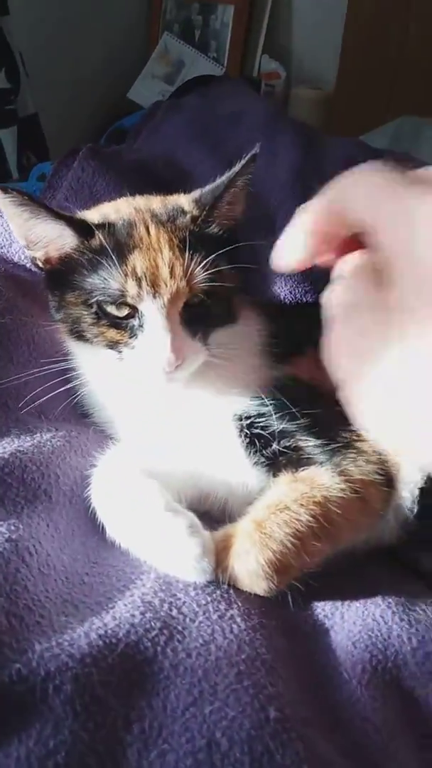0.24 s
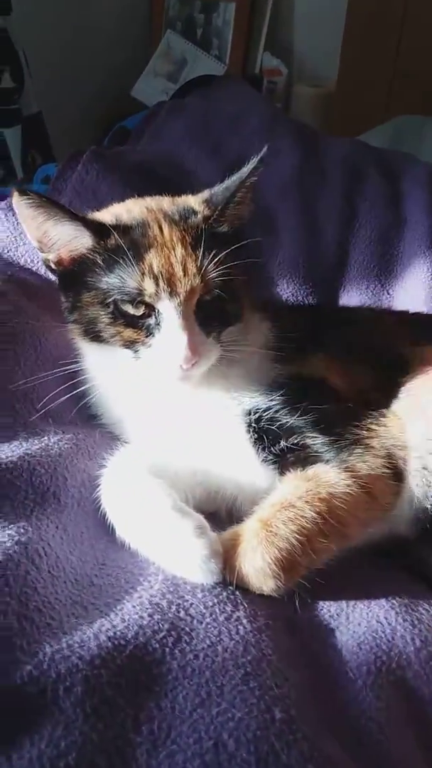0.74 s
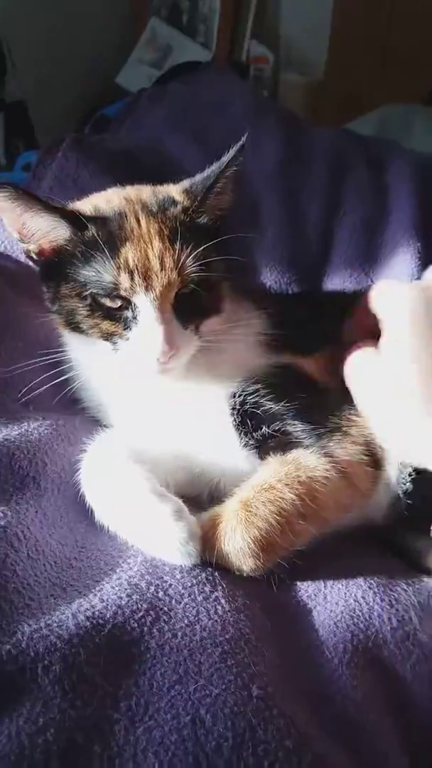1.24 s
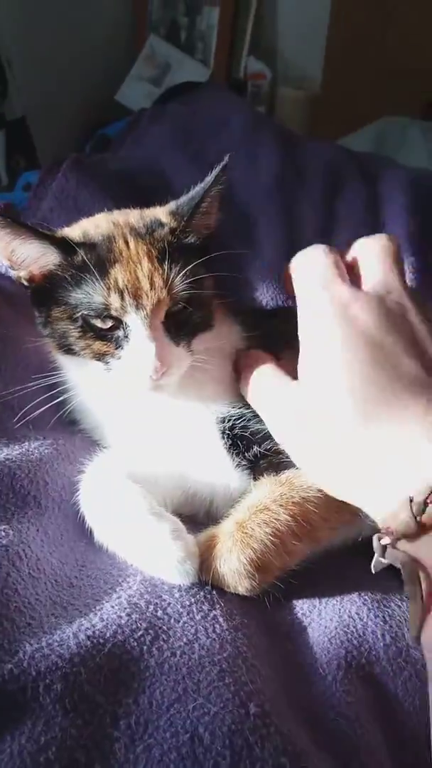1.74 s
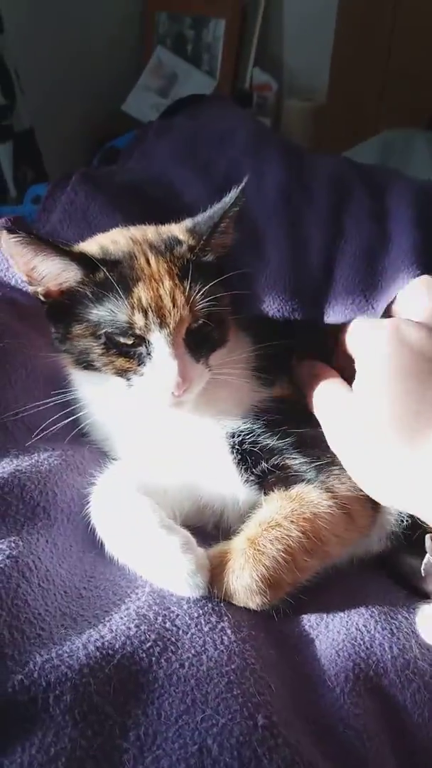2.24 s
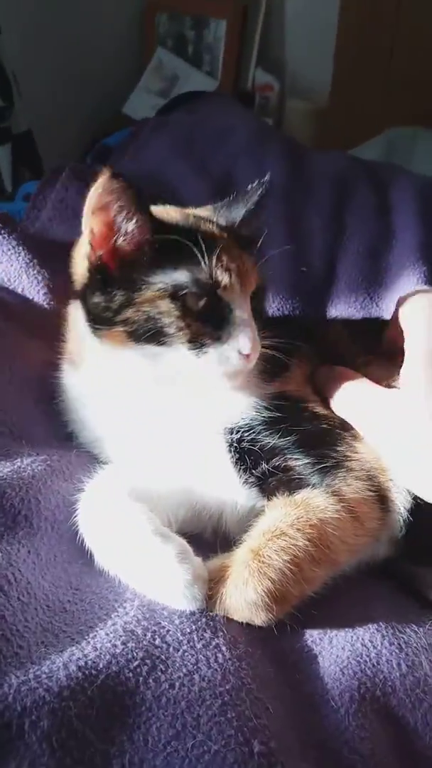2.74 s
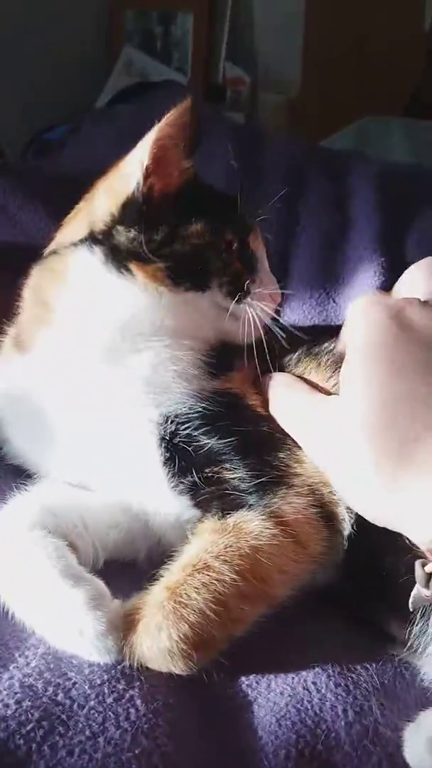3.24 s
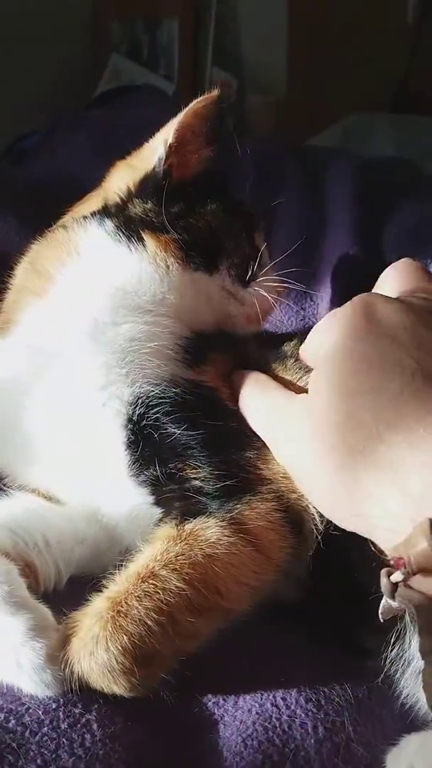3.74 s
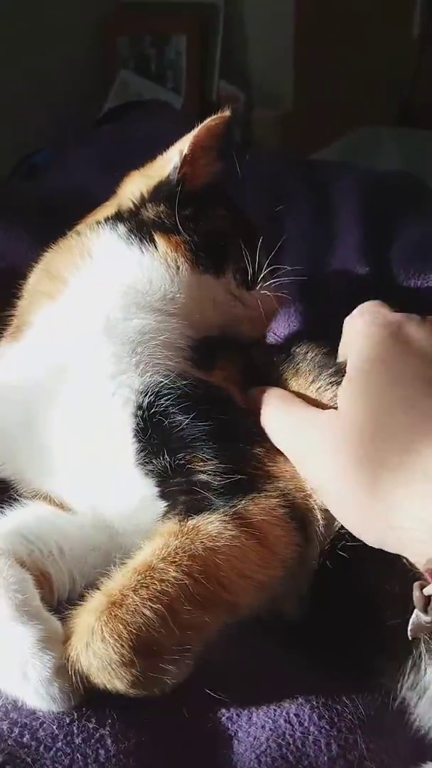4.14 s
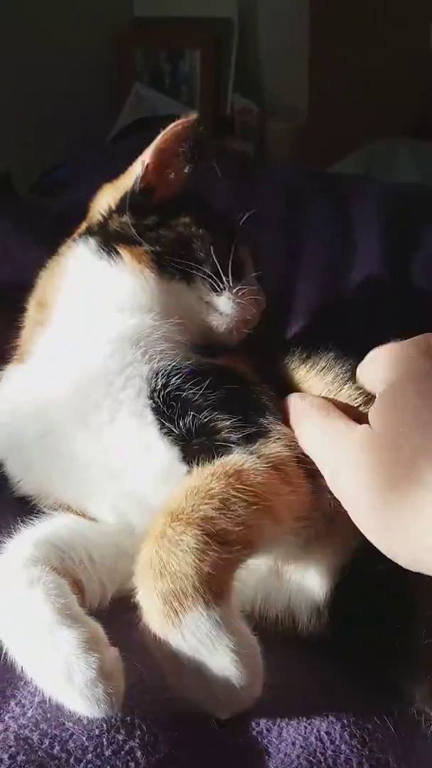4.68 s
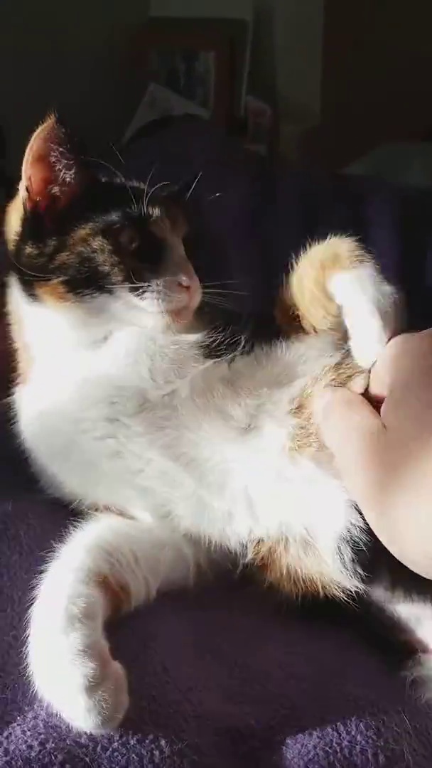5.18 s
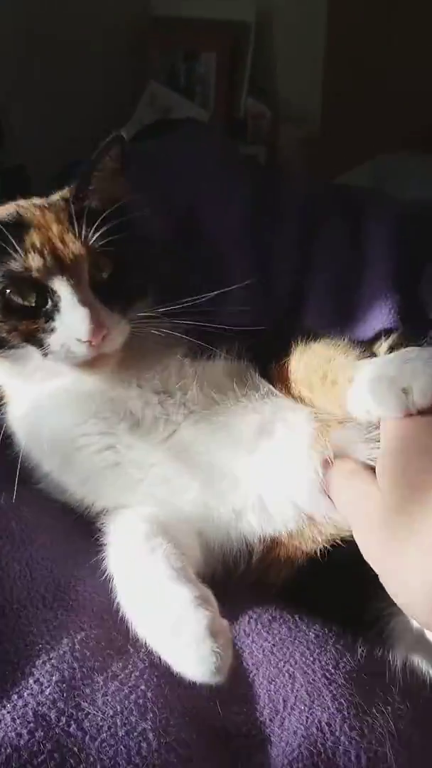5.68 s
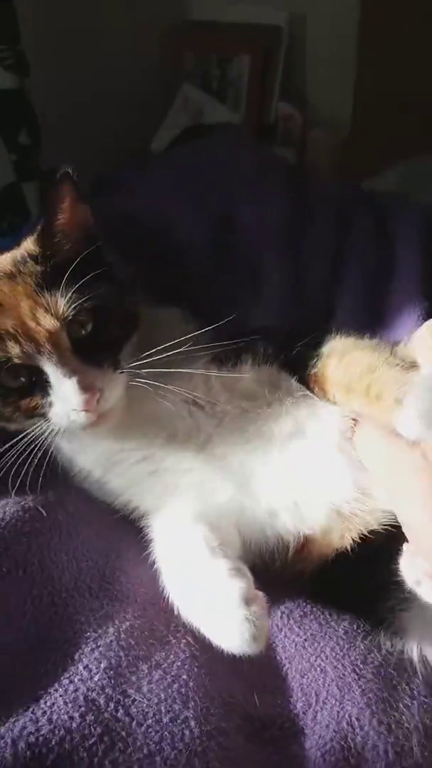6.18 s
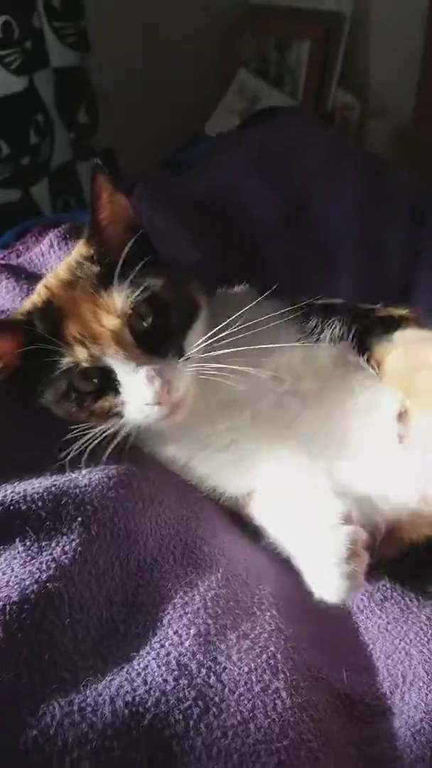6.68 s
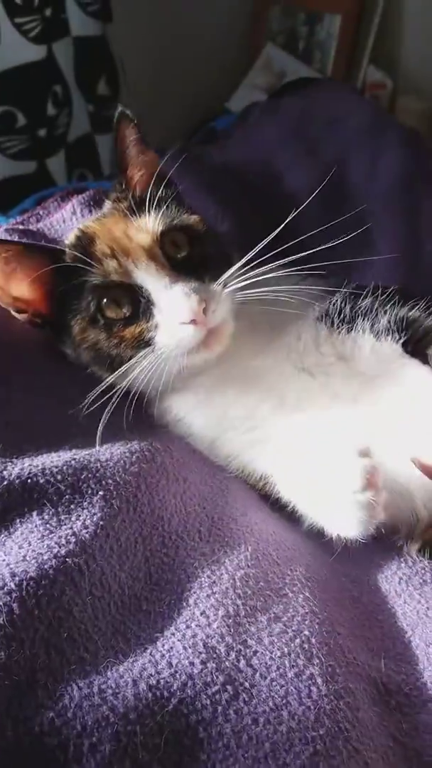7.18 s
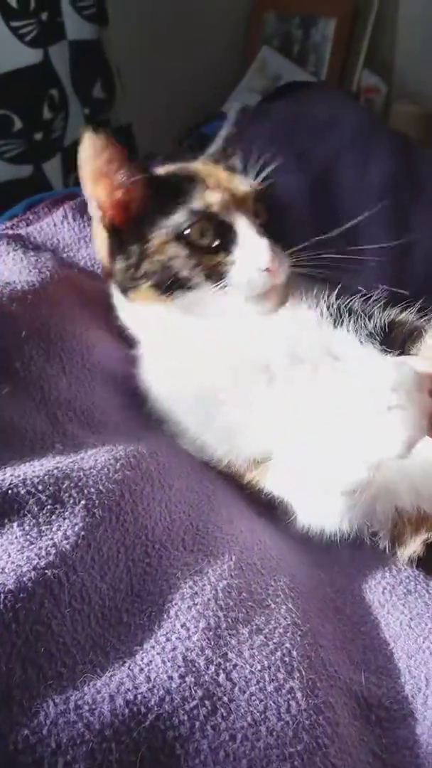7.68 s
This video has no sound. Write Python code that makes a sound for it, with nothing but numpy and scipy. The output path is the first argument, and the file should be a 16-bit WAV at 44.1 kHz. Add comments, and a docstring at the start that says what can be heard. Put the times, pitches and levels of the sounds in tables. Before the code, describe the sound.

Close, dry handling noise in a quiet room, about eight seconds. A low, unevenly throbbing rumble and faint steady hiss run throughout, with soft rubbing that swells and fades. From 0.1 to 1.1 seconds, dull bumps come thickly, each a quick falling sweep with a short bassy boom; short scuffs and small ticks mix in, with a heavy lurch at 0.7. The strongest jolt, with a clear tick and scrape, lands at 1.25. A lone bump follows at 1.8, softer ones from 2.3, then a tight scuffing cluster with ticks at 3.1 to 3.2. Another scrape and thump come at 3.7, lighter bumps around 4, and a firm thud at 4.4. After a pause, muffled knocks come from 5.0 to 5.75, the strongest at 5.3. A low lurch at 6.5 leads to bumps at 6.6, 6.9 and 7.3, and softer ones with a scuff near 7.8.

```python
"""A hand shifts its hold on a phone case: dull bumps sweep downwards and boom briefly, a few with a faint tick.
Each bump is a push that the case spreads into a falling sweep, with a snap and a low ring added.
Three heavier lurches swing low, and short bursts of tiny slips make the scuffs.
Underneath are an unevenly throbbing rumble, soft rubbing and microphone hiss, all from random numbers.
The room is quiet: a cat is stroked on a blanket close by, but no layer plays the cat itself."""
import sys
import numpy as np
from scipy import signal
from scipy.fft import rfft, irfft, next_fast_len
from scipy.io import wavfile
from scipy.ndimage import map_coordinates

SR = 44100
rng = np.random.default_rng(int(sys.argv[2]) if len(sys.argv) > 2 else 0)


def dump_mix(stems):
    """Bounce the given channels to the path in sys.argv[1] as a 16-bit WAV at rate SR."""
    frames = np.atleast_2d(stems).T  # one column per channel
    limited = np.clip(frames, -1, 1)  # hard clip at full scale
    pcm = np.round(limited * 32767).astype(np.int16)
    wavfile.write(sys.argv[1], SR, pcm)


N = 349272  # length of the scene [samples]


def amp(db):
    """Turn decibels into a gain."""
    return 10 ** (np.asarray(db) / 20)


def unit(x):
    """Scale to an rms (average strength) of 1."""
    return x / np.sqrt(np.mean(x ** 2) + 1e-20)


def peak_one(x):
    """Scale so that the highest peak is 1."""
    return x / np.abs(x).max()


def add(track, s, sound):
    """Mix a sound into the track from time s."""
    start = max(round(s * SR), 0)
    part = track[start:start + len(sound)]
    part += sound[:len(part)]


def filtered(x, response):
    """Filter x by a complex response, given as a function of frequency."""
    m = next_fast_len(len(x) + 8192)  # spare room, so that tails do not wrap round to the start
    hz = np.fft.rfftfreq(m, 1 / SR)
    return irfft(rfft(x, m) * response(hz), m)[:len(x)]


def colour(x, spectrum):
    """Shape x by (frequency, level) points and bring it to rms 1."""
    point_hz, point_db = np.transpose(spectrum)

    def response(hz):
        return amp(np.interp(np.log(hz + 1), np.log(point_hz), point_db))

    return unit(filtered(x, response))


def noise(spectrum, size):
    """Make steady coloured noise of rms 1."""
    return colour(rng.standard_normal(size), spectrum)


def high_pass(hz, corner_hz, q):
    """Response of a second-order bass cut; a high q makes it resonate at the corner."""
    s = 1j * hz / corner_hz
    return s * s / (1 + s / q + s * s)


def wobble(per_s):
    """Draw a smooth random curve with so many knots a second."""
    knots = rng.standard_normal(int(N * per_s / SR) + 4)
    return map_coordinates(knots, [np.arange(N) * per_s / SR])


def case(hz, hardness_hz, thin_hz, corner_hz=66, q=1.89, thin_q=0.56, bending_hz=1.606):
    """What the microphone gets from one soft push on the case."""
    contact = np.exp(-hz / hardness_hz)  # soft skin passes little treble
    bending = np.exp(-1j * np.sqrt(hz / bending_hz))  # high bending waves arrive first: a falling sweep
    return contact * high_pass(hz, thin_hz, thin_q) * high_pass(hz, corner_hz, q) * bending


# colour of the microphone's hiss: (frequency [Hz], relative level [dB per Hz])
HISS_COLOUR = [(20, -2.5), (300, 9.5), (600, 9), (1200, 6), (2000, 3.5), (3300, 0), (5000, -5.5),
               (7000, -13.5), (8500, -12), (11000, -3.5), (12700, 1.5), (14000, -1), (15000, 0.5),
               (20000, -20.5)]


def hiss(level_db=-69):
    """The microphone's hiss: steady random noise, coloured by the table."""
    return amp(level_db) * noise(HISS_COLOUR, N)


# how restless the grip is: (time [s], level [dB]), the rubbing before its overall boost
GRIP_RESTLESSNESS = [(0.0, -69.5), (0.15, -69.5), (0.55, -55), (0.84, -58), (0.99, -51.5), (1.19, -65),
                     (1.45, -63.5), (2.32, -71), (2.6, -50), (3.64, -52.5), (4.19, -65.5), (4.61, -62),
                     (5.45, -60), (6.15, -65.5), (6.46, -62), (6.57, -63.5), (7.7, -57.5), (7.92, -50.5)]


def restlessness_db(s):
    """Restlessness of the grip at time s, in straight lines between the table's points."""
    return np.interp(s, *np.transpose(GRIP_RESTLESSNESS))


# colour of the low rumble: (frequency [Hz], relative level [dB per Hz])
RUMBLE_COLOUR = [(20, -21.5), (32, -15.5), (45, -6), (62, 4.5), (85, -1), (120, -5), (170, -32.5),
                 (260, -31.5), (600, -60)]


def rumble(restless_db, grip, mean_db=-44.5, follows=0.25, throb_db=2.5):
    """Low noise that throbs with the grip and swells a little (follows, dB per dB) when it is restless."""
    level_db = mean_db + follows * (restless_db - restless_db.mean())
    return amp(level_db + throb_db * grip) * noise(RUMBLE_COLOUR, N)


def rubbing(restless_db, grip, boost_db=7.0, slips_per_s=190, spread_db=4.5,
            hardness_hz=68, thin_hz=240, catch_db=2.5):
    """Many small slips of skin at random moments, each pushing the case one way or the other."""
    happens = rng.random(N) < slips_per_s / SR
    strength = amp(spread_db * rng.standard_normal(N))
    slips = happens * strength * rng.choice([-1, 1], N)
    through_case = unit(filtered(slips, lambda hz: case(hz, hardness_hz, thin_hz)))
    return amp(restless_db + boost_db + catch_db * grip) * through_case


def ground():
    """The rumble and the rubbing, which swell together as the grip wavers."""
    restless_db = restlessness_db(np.arange(N) / SR)
    grip = np.tanh(wobble(22))  # the pressure of the hand stays within bounds
    return rumble(restless_db, grip) + rubbing(restless_db, grip)


# colour of a tick: (frequency [Hz], relative level [dB per Hz])
TICK_COLOUR = [(300, -5.5), (700, 8.5), (1300, -2.5), (2000, -14), (3100, -22.5), (4000, -32.5),
               (6000, -55.5)]
# small dry ticks of the case, most of them close to a bump: (time [s], peak level [dB])
TICK_TIMES = [(0.416, -45), (.689, -39), (1.247, -52.5), (1.256, -26.5), (1.271, -37), (1.778, -43.5),
              (1.781, -38), (2.454, -49), (3.068, -44), (3.075, -36.5), (3.098, -41.5), (3.116, -38.5),
              (3.159, -43), (3.704, -57), (6.501, -52)]


def ticks(grit=0.12, t60=0.017, bending_hz=3, size=2048):
    """Small dry ticks: one crack with a gritty tail, its high part arriving first as in the bumps."""
    track = np.zeros(N)
    lead = 0.005  # silence kept ahead of the crack [s]
    t = np.arange(size) / SR
    for s, db in TICK_TIMES:
        tail = grit * rng.standard_normal(size) * amp(-60 * t / t60)
        crack = np.pad((t == 0) + tail, (round(lead * SR), 0))
        swept = filtered(crack, lambda hz: np.exp(-1j * np.sqrt(hz / bending_hz)))
        tick = peak_one(colour(swept, TICK_COLOUR))
        add(track, s - lead - 0.001, amp(db) * tick)  # 1 ms early, as the sweep delays the sound
    return track


# skin drags over the case: (time [s], length [s], peak level [dB])
SCUFF_TIMES = [(0.201, 0.01, -43), (0.261, 0.022, -29.5), (0.66, 0.025, -30.5), (0.743, 0.027, -32),
               (0.868, 0.095, -32.5), (0.911, 0.017, -31), (1.052, 0.028, -39), (1.232, 0.026, -19),
               (1.271, 0.015, -21.5), (1.383, 0.027, -37), (2.445, 0.024, -33), (3.062, 0.095, -25),
               (3.611, 0.017, -30.5), (3.682, 0.047, -21), (4.074, 0.034, -27), (5.33, 0.034, -33.5),
               (5.901, .015, -43.5), (6.185, 0.062, -41), (6.3, 0.013, -41), (6.432, 0.063, -38),
               (6.551, 0.014, -33.5), (6.862, 0.018, -38.5), (7.222, 0.053, -38), (7.343, 0.02, -27),
               (7.806, 0.082, -35)]


def scuffs(hardness_hz=115, thin_hz=190, size=8192):
    """Short drags: a dense swell of tiny slips that sounds through the case."""
    track = np.zeros(N)
    t = np.arange(size) / SR
    for s, length, db in SCUFF_TIMES:
        swell = np.sin(np.pi * np.clip(t / length, 0, 1))
        slips = rng.standard_normal(size) * swell
        scuff = peak_one(filtered(slips, lambda hz: case(hz, hardness_hz, thin_hz)))
        add(track, s, amp(db) * scuff)
    return track


# the whole phone lurches in the hand: (time [s], peak level [dB])
LURCH_TIMES = [(0.694, -17.5), (1.26, -13.5), (6.503, -17)]


def lurches(swing_hz=65, rise=0.0062, t60=0.05, size=8192):
    """A heavy swing of the phone against the palm, which damps it quickly (60 dB in t60 seconds)."""
    track = np.zeros(N)
    t = np.arange(size) / SR
    shape = (1 - np.exp(-(t / rise) ** 2)) * amp(-60 * t / t60)
    swing = peak_one(np.sin(2 * np.pi * swing_hz * t) * shape)
    for s, db in LURCH_TIMES:
        add(track, s, amp(db) * swing)
    return track


# fingers bump the case; snap and ring levels are relative to the push, the ring before its overall boost:
# (time [s], push peak level [dB], contact hardness [Hz], snap level [dB], ring level [dB])
BUMP_TIMES = [(0.102, -32, 127, -22, 13.5), (0.287, -12.5, 75.5, -41, -16), (0.416, -10.5, 136, -17.5, -31),
              (0.432, -15.5, 107, -42.5, -32), (0.46, -17, 105, -20, -4), (0.568, -16.5, 105, -11.5, -10.5),
              (0.628, -12.5, 74, -45, -26), (0.669, -14, 78, -36, -33), (0.688, -8, 72, -32.5, -6),
              (0.751, -12, 64, -29, -8.5), (0.858, -16.5, 75, -48, 5.5), (0.879, -16.5, 80, -33, -32),
              (0.919, -17.5, 98, -26, -12), (0.93, -21, 80, -36, -0.5), (0.988, -13, 109, -15, -8.5),
              (1.073, -31.5, 81, -38, 11.5), (1.254, -5.5, 52, -12.5, -11), (1.27, -7, 80, -20, -1.5),
              (1.781, -17, 100, -26, -1.5), (2.324, -25, 117, -28, -21), (2.459, -22.5, 95, -41, -16),
              (2.533, -34.5, 90, -37, -10), (2.788, -27, 105, -18, -15), (2.897, -21.5, 80, -48, 6),
              (3.073, -17, 67, -18.5, -15.5), (3.095, -13, 120, -50, -29), (3.114, -13, 110, -46, -30),
              (3.155, -15, 118, -46, -35.5), (3.187, -23, 110, -22, -5), (3.293, -21, 58, -50, 5.5),
              (3.382, -27, 95, -52, 3.5), (3.429, -29, 83, -46, -20), (3.675, -30, 128, -15, -22),
              (3.709, -12.5, 92, -22.5, -7), (3.759, -17, 81.5, -22.5, 6), (3.91, -24.5, 94, -43, -11),
              (3.971, -28.5, 96, -44, -15), (4.046, -27, 105, -49, -23), (4.078, -25, 95, -38, 11),
              (4.1, -28.5, 88, -13, -4), (4.381, -10, 79, -20.5, -15), (4.461, -29, 71, -30, 2),
              (5.026, -21.5, 106, -50, 1), (5.061, -31, 99, -25, 4), (5.188, -22.5, 56, -34.5, -9),
              (5.327, -12.5, 78.5, -36, -22), (5.342, -17.5, 96, -22.5, 7.5), (5.53, -26, 94, -52, -9),
              (5.749, -28, 58, -24, -12), (6.261, -32, 75.4, -40, -10), (6.497, -20.5, 62, -16.5, -9.5),
              (6.578, -15.5, 67.6, -40, -27), (6.612, -17, 71, -44, 0), (6.936, -16, 58.5, -32, -2.5),
              (7.267, -22.5, 55.5, -28, -17), (7.29, -18.5, 73, -33, -7.5), (7.34, -17, 86, -36, -17),
              (7.353, -22, 94, -46, -1), (7.673, -22.5, 87, -43, 2), (7.785, -33, 54.5, -15.5, -13)]


def bumps(thin_hz=161, grit=0.012, grit_t60=0.05, snap_hardness_hz=150, snap_thin_hz=650,
          ring_hz=65, ring_t60=0.13, ring_rise=0.022, ring_boost_db=3, size=8192):
    """A short falling sweep roughened by slipping skin, with a sharper snap and a low ring of the held phone."""
    track = np.zeros(N)
    hz = np.fft.rfftfreq(size, 1 / SR)
    lead = 0.02  # silence kept ahead of the push [s]
    delay = np.exp(-2j * np.pi * hz * lead)  # a single click, placed after the lead
    t = np.maximum(np.arange(size) / SR - lead, 0)  # time since the push
    ring_shape = (1 - np.exp(-(t / ring_rise) ** 2)) * amp(-60 * t / ring_t60)
    snap_response = case(hz, snap_hardness_hz, snap_thin_hz) * high_pass(hz, snap_thin_hz, 0.14)
    snap = peak_one(irfft(snap_response * delay, size))
    detunes = rng.standard_normal(len(BUMP_TIMES))
    for (s, db, hardness_hz, snap_db, ring_db), detune in zip(BUMP_TIMES, detunes):
        slips = grit * rng.standard_normal(size) * (t > 0) * amp(-60 * t / grit_t60)
        push_spectrum = case(hz, hardness_hz, thin_hz) * (delay + rfft(slips))
        push = peak_one(irfft(push_spectrum, size))
        bump_ring_hz = ring_hz * np.exp(0.14 * detune)  # each bump rings at a slightly different pitch
        ring = ring_shape * np.sin(2 * np.pi * bump_ring_hz * t)
        bump = amp(snap_db) * snap + amp(ring_db + ring_boost_db) * ring - push
        add(track, s - lead, amp(db) * bump)
    return track


def scene():
    """Everything reaches one microphone directly, without room sound."""
    handling = ground() + ticks() + scuffs() + lurches() + bumps()
    return (handling + hiss())[None]


def record(dry, bass_hz=50, bass_q=0.96, top_hz=15720):
    """The phone cuts the deepest bass, starts and stops softly, and drops everything from top_hz up."""
    sound = filtered(dry[0], lambda hz: high_pass(hz, bass_hz, bass_q))
    fade = signal.windows.tukey(N, 0.001)  # about 4 ms at each end
    return filtered(sound * fade, lambda hz: hz < top_hz)[None]


dry = scene()
out = record(dry)
dump_mix(out)
```